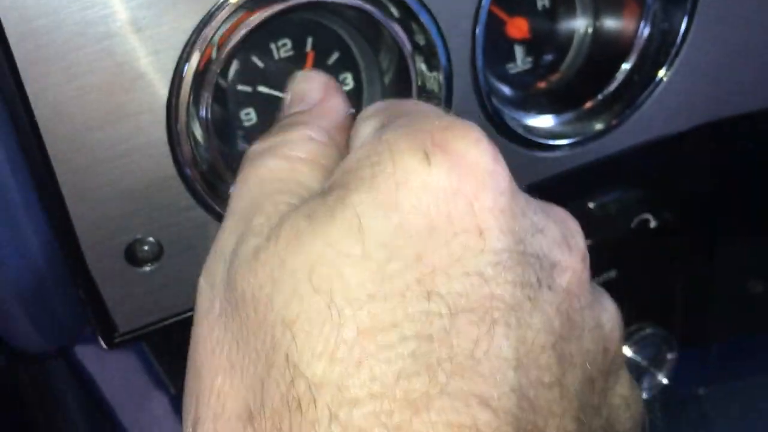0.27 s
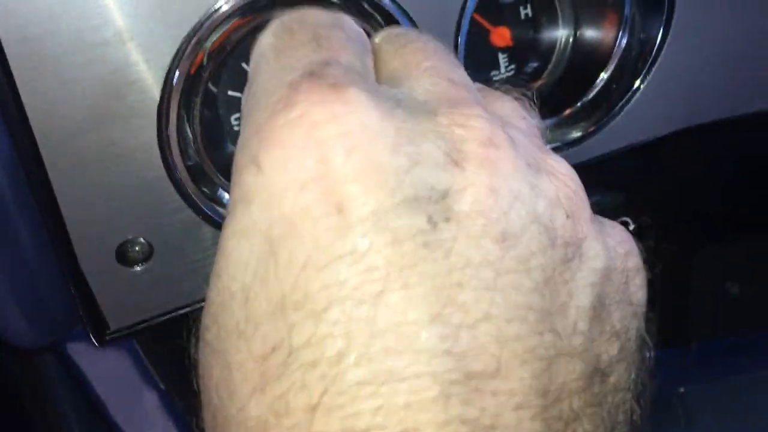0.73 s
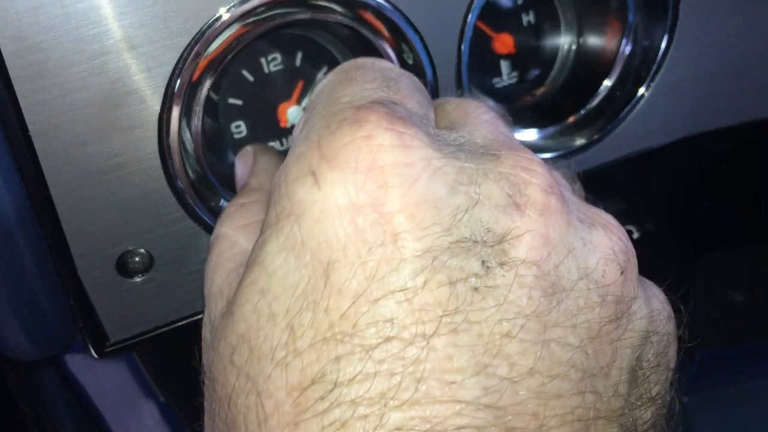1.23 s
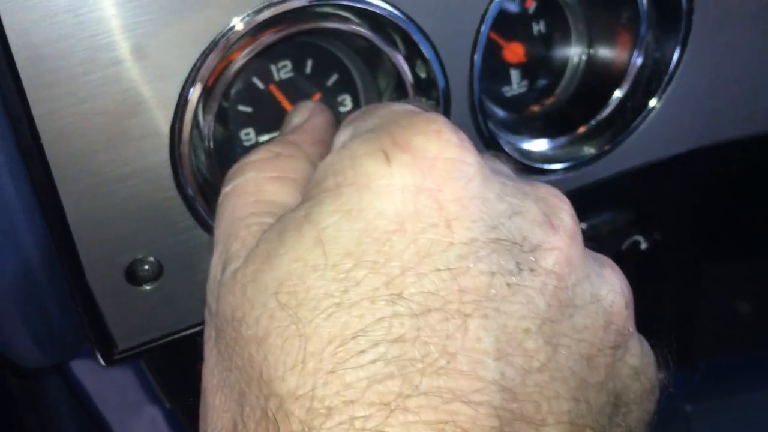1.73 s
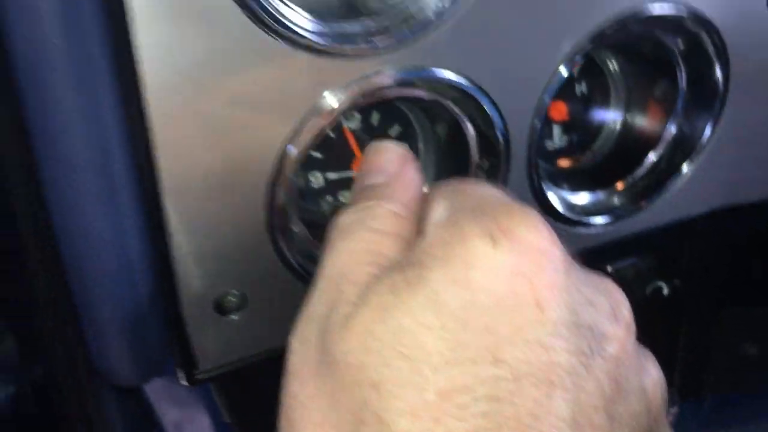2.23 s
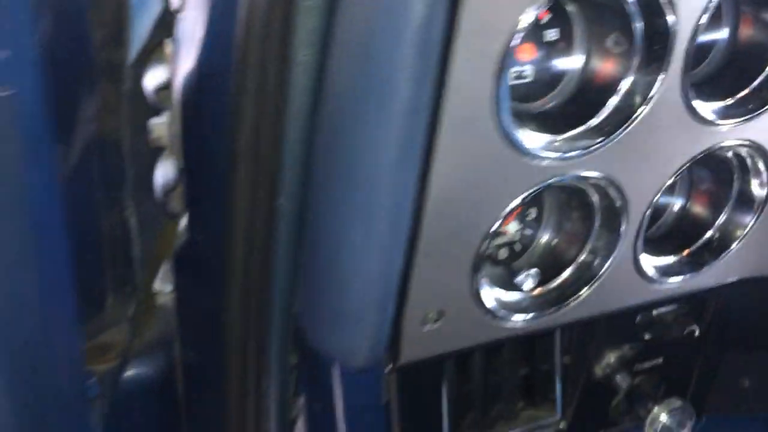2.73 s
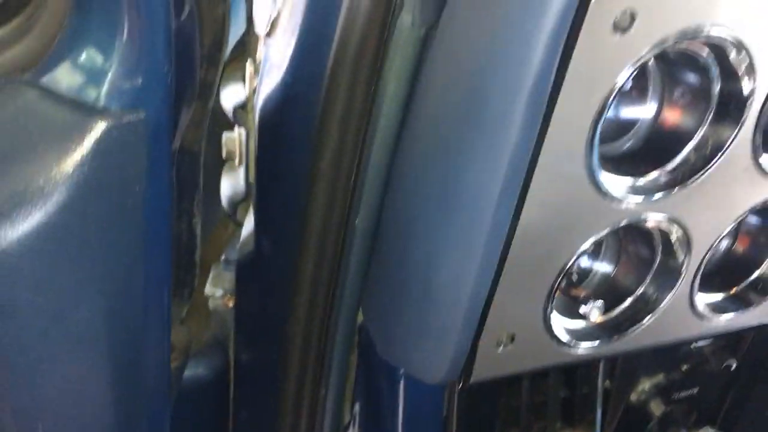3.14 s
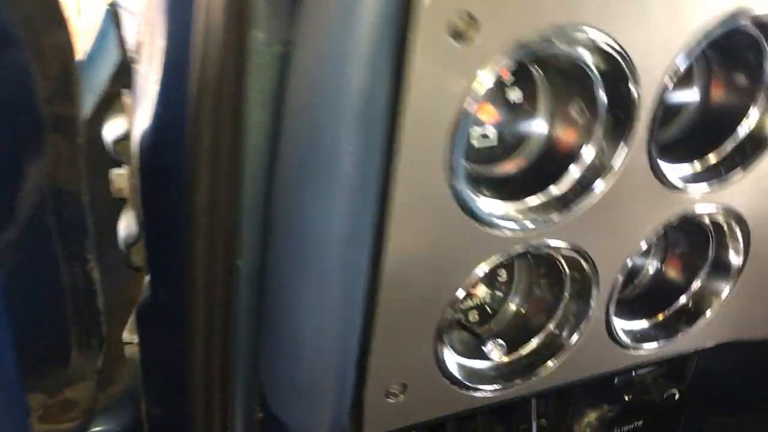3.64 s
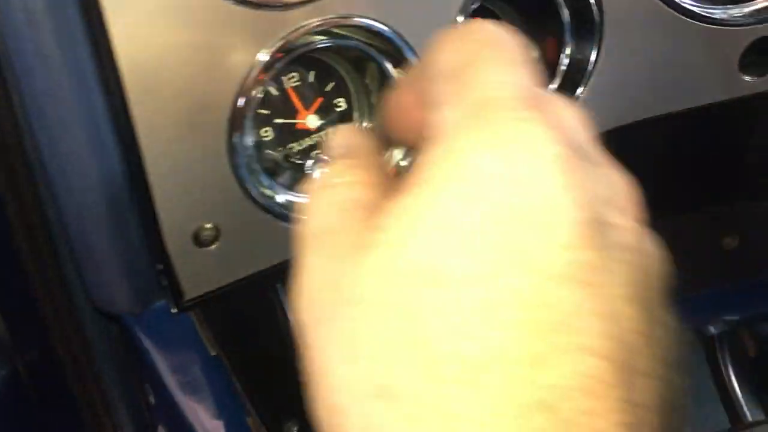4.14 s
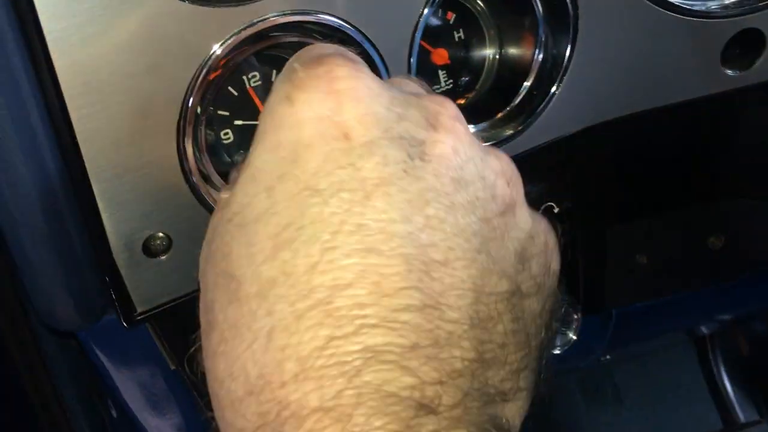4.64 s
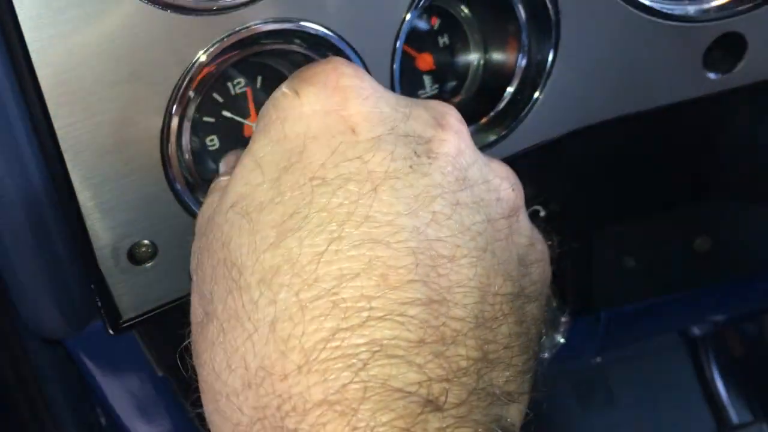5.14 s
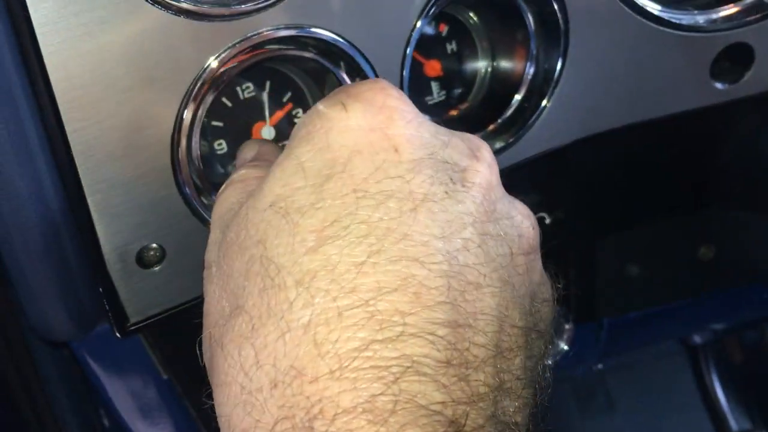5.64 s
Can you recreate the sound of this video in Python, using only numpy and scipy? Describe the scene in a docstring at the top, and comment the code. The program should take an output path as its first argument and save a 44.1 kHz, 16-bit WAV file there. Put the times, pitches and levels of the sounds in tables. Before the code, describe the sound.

Inside a closed, quiet cab with swelling low booms and faint hiss, fingers work a stiff clock stem right beside a phone. Two hard metallic cracks clip the microphone, each with brief ringing, clatter and a dull dash thump. Between them the knob turns with a dry, uneven rasp. Later come dull fingertip taps, several moderate ticks in quick succession, and light scraping with tiny squeaks.

```python
"""The stem of a dashboard clock ticks and snaps in a parked truck, set by hand a few centimetres from a phone.
Two snaps overload the microphone: a noise crack, ringing case modes, clatter and a low dash thump.
Between them the knob turns with a dry rasp of dense slips; later it ticks and scrapes in short twists,
with brief squeaks of wavering tone. The closed cab hums in low booms and rumble under faint hiss."""
import sys
import numpy as np
from scipy import signal
from scipy.fft import rfft, irfft, next_fast_len
from scipy.io import wavfile
from scipy.ndimage import uniform_filter1d

SR = 44100
rng = np.random.default_rng(int(sys.argv[2]) if len(sys.argv) > 2 else 0)


def materialize(psi):
    """Save the field psi as 16-bit PCM at rate SR to the path in sys.argv[1].

    A 1-D psi becomes a single channel; in a 2-D psi each row is a channel.
    """
    bounded = np.clip(np.atleast_2d(psi).T, -1, 1)
    quanta = np.round(bounded * 32767).astype(np.int16)
    wavfile.write(sys.argv[1], SR, quanta)


N = 259749
TIME = np.arange(N) / SR  # seconds

# modes of the clock case and its metal panel: pitch_hz, level_db (relative), t60_s
CASE_MODES = [(564, -11.5, 0.76), (618, -8, 0.1), (876, -5.5, 0.12), (1030, -3.5, 0.15), (1256, -1, 0.1),
              (1276, 3, 0.07), (1427, 0, 0.019), (1663, -4.5, 0.035), (1594, 2, 0.05), (1950, -7, 0.055),
              (1943, -4, 0.11), (2150, -11, 0.071), (2250, -4, 0.078), (2386, -10, 0.1), (2500, -16, 0.038),
              (2970, -22, .08), (3460, -9, 0.12), (4140, -21.5, 0.079), (4290, -7.5, 0.11),
              (5820, -3.5, 0.059), (6000, -1.5, 0.065), (6480, -2.5, 0.09), (7108, 2, 0.028),
              (7260, -0.5, .05), (8250, 3, 0.095), (8940, 6.5, 0.064), (9564, 8.5, 0.045), (13200, 0, .05),
              (13170, -3, 0.036)]
# spectrum of rubbing, also lent to the cab's answer: freq_hz, level_db (relative, per Hz)
RASP_SPECTRUM = [(250, -19.5), (550, -3.5), (950, 5.5), (1400, 6), (2400, -1), (3000, -5), (4000, -8.5),
                 (5200, -12.5), (6500, -8), (7400, -9), (8500, -7.5), (11000, -13.5), (15000, -19.5)]


def undb(db):
    """Decibels to gain."""
    return 10 ** (np.asarray(db) / 20)


def unit(x):
    """Scale to rms 1."""
    return x / np.sqrt(np.mean(x ** 2))


def add(out, start_s, x):
    """Mix x into out from start_s, cut off at the end of out."""
    i = max(int(start_s * SR), 0)
    out[i:i + len(x)] += x[:len(out) - i]


def shape(x, gain):
    """Filter x with a gain that is a function of frequency in Hz."""
    size = next_fast_len(len(x))
    hz = np.maximum(np.arange(size // 2 + 1) * SR / size, 1)
    return irfft(rfft(x, size) * gain(hz), size)[:len(x)]


def colour(x, points, tilt=0):
    """Give x a spectrum of (Hz, dB) points, tilted in dB per octave and closed below; rms 1."""
    hz, db = np.transpose(points)

    def gain(f):
        level_db = np.interp(np.log(f), np.log(hz), db) + tilt * np.log2(f)
        return undb(level_db) * np.minimum(f / hz[0], 1) ** 2

    return unit(shape(x, gain))


def fade(t, t60):
    """Exponential decay, 60 dB in t60 seconds."""
    return np.exp(-np.log(1000) * t / t60)


def ring(modes, t, tilt=0):
    """Damped modes after a blow, starting near rms 1, in fresh random phases for every blow."""
    hz, db, t60 = np.transpose(modes)[:, :, None]
    gain = undb(db + tilt * np.log2(hz))
    waves = np.sin(2 * np.pi * (hz * t + rng.random(hz.shape)))
    return np.sum(gain * waves * fade(t, t60), axis=0) / np.sqrt(np.sum(gain ** 2) / 2)


def walk(rate):
    """Slow random wander through rate random points a second, with a spread near 1."""
    knots = rng.standard_normal(int(N / SR * rate) + 2)
    return np.interp(TIME * rate, np.arange(len(knots)), knots)


def hiss(level_db=-53.08):
    """Faint, smooth background air: steady noise with a falling spectrum."""
    # spectrum of the air: freq_hz, level_db (relative, per Hz)
    air_spectrum = [(350, -13.5), (700, -11), (1100, -11), (1900, -17.5), (3200, -21), (5000, -29),
                    (6500, -26), (8000, -30), (9600, -23.5), (10800, -29), (13000, -25), (15000, -34)]
    return undb(level_db) * colour(rng.standard_normal(N), air_spectrum)


def boom(hz, waver, waver_rate, partner_db=-5, throb_db=2.0, throb_rate=11):
    """A close pair of low tones that wander in pitch, beat and throb; rms 1."""
    def tone():
        return np.sin(2 * np.pi * np.cumsum(hz * (1 + waver * walk(waver_rate))) / SR)

    pair = tone() + undb(partner_db) * tone()
    return unit(pair * undb(throb_db * walk(throb_rate)))


def resonate(modes, even_s=0.33):
    """Noise rumbling in air resonances, with its slow level evened out to rms 1."""
    def gain(f):
        return sum(undb(db) / (1 + ((f / hz - hz / f) * hz / width) ** 2) for hz, width, db in modes)

    x = shape(rng.standard_normal(N), gain)
    window = signal.windows.hann(int(even_s * SR))
    power = signal.fftconvolve(x ** 2, window, "same") * 2 / (even_s * SR)
    return x / np.sqrt(power)


def cab_hum(deep_db=-37.5, rumble_db=-2.0, settle_s=0.6, follow=1.1, rest_db=-35):
    """Two wavering cab booms swell and sink; rumble follows the upper one slowly over an even deep layer."""
    # swell of the two booms, ahead of the small trims below: time_s, lower_db, upper_db
    swells = [(0.0, -36.5, -41), (0.22, -36.5, -40), (0.38, -18, -29.5), (0.55, -39.5, -33),
              (0.7, -29, -31.5), (1.35, -28.5, -28.5), (1.551, -35.5, -33), (1.851, -26.5, -40.5),
              (2.1, -34.5, -36), (2.498, -25.5, -42), (3.5, -38, -39), (3.78, -20.5, -44),
              (4.05, -35.5, -38.5), (4.45, -26.5, -32), (5.0, -20.5, -26), (5.55, -33.5, -32),
              (5.89, -27, -47)]
    # broad rumble of the cab: pitch_hz, width_hz, level_db (relative)
    rumble_modes = [(85, 24, 3), (104.26, 26, 9), (145.9, 37, -1.5), (197.6, 31, 2.5), (234, 20, -0.5),
                    (262.3, 19, -13), (299, 21, -11.5), (354.8, 18, -11), (450, 260, -34)]
    # deepest cab resonances: pitch_hz, width_hz, level_db (relative)
    deep_modes = [(43, 5, -7.5), (62, 120, -10)]
    s, lower_db, upper_db = np.transpose(swells)
    lower_db, upper_db = np.interp(TIME, s, lower_db), np.interp(TIME, s, upper_db)
    slow_db = rest_db + follow * uniform_filter1d(upper_db - rest_db, int(settle_s * SR))
    lower = undb(lower_db - 1) * boom(hz=102.85, waver=.05, waver_rate=12)
    upper = undb(upper_db + 0.2) * boom(hz=178.4, waver=.05, waver_rate=14)
    rumble = undb(rumble_db + slow_db) * resonate(rumble_modes)
    return lower + upper + rumble + undb(deep_db) * resonate(deep_modes)


def echoes(x, trim_db=-1):
    """Dash, glass and roof close by return the sound and comb its spectrum."""
    # early echoes: delay_s, level_db (relative to the direct sound)
    reflections = [(.0029, -17), (.0053, -10), (.0096, -13), (0.0132, -9)]
    out = x.copy()
    for delay, db in reflections:
        add(out, delay, undb(db) * x)
    return undb(trim_db) * out


def touches(rise_s=0.0024):
    """A fingertip gives a soft, dull tick: a noise burst with a gentle rise and a decay."""
    # fingertips on the knob, its rim or the phone: start_s, level_db (before the decay), t60_s
    taps = [(3.093, -48, 0.32), (4.094, -42.5, .17), (4.405, -30, 0.045), (4.533, -39, 0.044)]
    # spectrum of a fingertip: freq_hz, level_db (relative, per Hz)
    tap_spectrum = [(900, -10), (1400, -3), (1950, 4.5), (2600, -7), (4300, -14), (5600, -18), (7200, -35),
                    (15000, -36)]
    out, t = np.zeros(N), TIME[:SR // 4]
    for s, db, t60 in taps:
        tap = colour(rng.standard_normal(len(t)), tap_spectrum)
        add(out, s, undb(db) * tap * fade(t, t60) * (1 - np.exp(-t / rise_s)))
    return out


def rasp(size, tilt, slips_per_s=1900, spread_db=3, ring_db=-3):
    """Dense tiny slips hiss directly and ring the case; spread_db makes their strength uneven; rms 1."""
    strength = undb(spread_db * np.minimum(rng.exponential(size=size), 4))
    slips = (rng.random(size) < slips_per_s / SR) * rng.choice([-1, 1], size) * strength
    # rubbing reaches only the middle modes
    middle = [mode for mode in CASE_MODES if 800 < mode[0] < 3000]
    case = signal.fftconvolve(slips, ring(middle, TIME[:SR // 10], tilt + 2))[:size]
    return unit(colour(slips, RASP_SPECTRUM, tilt) + undb(ring_db) * unit(case))


def squeaks(jitter=0.033, jitter_rate=600):
    """Where the knob sticks, slips lock to one rate and sound a wavering tone with two overtones."""
    # squeaks of the knob: start_s, length_s, pitch_hz, level_db, overtones_db (relative)
    sticking = [(0.905, 0.018, 1526, -35, -15), (0.996, 0.0086, 2090, -35.5, -7),
                (5.135, 0.022, 1575, -27.5, -23), (5.244, 0.013, 1430, -36.5, -30)]
    out = np.zeros(N)
    for s, length, hz, db, overtones_db in sticking:
        size = int(length * SR)
        phase = 2 * np.pi * np.cumsum(hz * (1 + jitter * walk(jitter_rate)[:size])) / SR
        overtones = np.sin(2 * phase) / 2 + np.sin(3 * phase)
        tone = unit(np.sin(phase) + undb(overtones_db) * overtones)
        add(out, s, undb(db) * tone * signal.windows.tukey(size, .7))
    return out


def winding(edge=0.29, scatter_db=3.5, slide_db=-8, catch_share=0.6, ease_db=-7, ease_s=0.23):
    """The knob catches once a step and slides quietly in between, ever more lightly as the grip eases."""
    # steady turning: start_s, end_s, step_s, level_db (before the easing), tilt_db_per_octave
    spells = [(0.0, 0.151, 0.0469, -33.5, 0.6), (5.035, 5.863, .095, -41.5, -2.1)]
    out = np.zeros(N)
    for start, end, step_s, db, tilt in spells:
        t = TIME[:int((end - start) * SR)]
        grip = np.full(len(t), undb(slide_db))
        catch = signal.windows.tukey(int(catch_share * step_s * SR), edge)
        for s in np.arange(0, t[-1], step_s):
            add(grip, s, catch * undb(scatter_db * rng.standard_normal()))
        # starts half the easing down and sinks by the whole of it, with time constant ease_s
        eased_db = db + ease_db * (0.5 + 1 - np.exp(-t / ease_s))
        add(out, start, undb(eased_db) * grip * rasp(len(t), tilt))
    return out


def twists(edge=0.35):
    """Each short twist of the knob is a burst of rasp that swells and stops."""
    # short twists: start_s, length_s, level_db, tilt_db_per_octave
    bursts = [(0.292, 0.025, -43.5, 5), (0.765, .125, -39.5, 2), (0.902, 0.039, -36.5, -1),
              (0.974, .03, -43.5, .5), (1.723, 0.06, -39.5, 1.5), (2.02, 0.023, -42.5, -1),
              (2.218, .06, -40, 2), (4.889, 0.073, -48, -4.5), (5.038, 0.036, -39, 0),
              (5.124, .072, -35, 0), (5.426, .047, -46.5, -2.5)]
    out = np.zeros(N)
    for s, length, db, tilt in bursts:
        size = int(length * SR)
        add(out, s, undb(db) * rasp(size, tilt) * signal.windows.tukey(size, edge))
    return out


def long_turn(grip_db=3.5, grip_rate=150, body_db=-0.76, sing_db=-2.5, sing_width_hz=550):
    """The knob winds the hands round; the grip catches unevenly, and harder turning sings higher and louder."""
    # effort of the turn: time_s, level_db (of the rasp, before body_db and sing_db), treble_db
    turn = [(1.07, -52.5, -67), (1.102, -36, -51), (1.136, -39, -50.5), (1.244, -32, -35.5),
            (1.256, -36, -44.5), (1.502, -46, -59.5), (1.514, -41, -55), (1.704, -47, -55.5),
            (1.715, -50, -69)]
    sing_hz, sing_rise_hz = 1140, 1440  # pitch under a light grip, and its rise at full effort
    s, db, treble_db = np.transpose(turn)
    level_db = np.interp(TIME, s, db)
    sound = rasp(N, 0, slips_per_s=990, spread_db=0.0)
    body = unit(shape(sound, lambda f: f < 4000))
    treble = unit(shape(sound, lambda f: f >= 4000))
    # half-regular slipping gathers in a rough band that rises with the effort
    effort = undb(level_db - db.max())
    phase = 2 * np.pi * np.cumsum(sing_hz + sing_rise_hz * effort) / SR
    band = walk(sing_width_hz) * np.cos(phase) + walk(sing_width_hz) * np.sin(phase)
    sing = effort * unit(band)
    grip = undb(grip_db * walk(grip_rate)) * (TIME > s[0]) * (TIME < s[-1])
    low = undb(level_db) * (undb(body_db) * body + undb(sing_db) * sing)
    return grip * (low + undb(np.interp(TIME, s, treble_db)) * treble)


def clicks(clatter_db=-8, crack_db=4.5, crack_t60=0.031, cab_db=-38, cab_t60=0.27, free_t60=0.13):
    """The stem hits its stop with a crack: case rings, works clatter, dash thumps, cab answers briefly."""
    # snaps and ticks of the stem: start_s, level_db, tilt_db_per_octave, t60_s
    blows = [(0.215, -34, -1, 0.047), (0.309, -35.5, -3, 0.39), (0.3408, 0, -.5, 0.085),
             (0.859, -19.5, 2, .015), (2.181, -40.5, -3, 0.14), (2.241, 0, -0.8, 0.082),
             (4.685, -24.5, -.3, .1), (4.81, -36.5, 0, 0.019), (4.826, -23, -5, 0.11),
             (4.833, -18.5, -4.5, 0.045), (4.846, -27, -3, 0.11), (4.857, -25, -5, 0.084),
             (4.9686, -18, -0.3, 0.084), (5.041, -37, -5, .13)]
    # spectrum of crack and clatter: freq_hz, level_db (relative, per Hz)
    snap_spectrum = [(200, -8.5), (700, -8), (1300, 1.5), (2400, 0), (3300, -7), (5000, -7.5), (6300, -2),
                     (9300, -10.5), (10300, -9), (12000, 0.5), (15000, -13)]
    # low modes of the dashboard: pitch_hz, level_db (relative), t60_s
    dash_modes = [(102.6, -5, 0.17), (137.5, 1, 0.21), (194.4, 1.5, 0.17), (289.4, -8, 0.21),
                  (364.5, 1.5, 0.13), (396, -6, 0.15)]
    hard_contact_s, soft_contact_s = 0.0006, .0012  # rise time of a full snap and of the lightest tick
    thump_db, thump_db_per_tilt, thump_rise_s = -13.5, -3, 0.0049  # duller clicks thump the dash more
    out, t = np.zeros(N), TIME[:SR // 2]

    def burst(spectrum, tilt):
        return colour(rng.standard_normal(len(t)), spectrum, tilt)

    for s, db, tilt, t60 in blows:
        # fingers on the knob damp the case further when t60 is shorter than free_t60
        damping = max(1 - t60 / free_t60, 0)
        case = ring(CASE_MODES, t, tilt) * fade(t * damping, t60)
        crack = undb(crack_db) * burst(snap_spectrum, tilt + 1.7) * fade(t, crack_t60 * t60 / free_t60)
        works = echoes(undb(clatter_db) * burst(snap_spectrum, tilt - .6) * fade(t, t60))
        cab = undb(cab_db) * burst(RASP_SPECTRUM, tilt) * fade(t, cab_t60)
        thump = undb(thump_db + thump_db_per_tilt * tilt) * ring(dash_modes, t)
        thump = thump * (1 - np.exp(-t / thump_rise_s))
        # a lighter blow has a softer contact and builds the sound up more slowly
        contact_s = np.interp(undb(db), [0, 1], [soft_contact_s, hard_contact_s])
        rise = 1 - np.exp(-t / contact_s)
        add(out, s, undb(db) * ((case + crack + works + cab) * rise + thump))
    return out


def scene():
    """The clock's noises over the hum of the cab, as one channel."""
    rubbing = twists() + winding() + long_turn() + squeaks()
    return (cab_hum() + hiss() + touches() + echoes(rubbing) + clicks())[None]


def record(dry, low_cut_hz=30, top_hz=15150):
    """The phone drops the deepest bass, clips the two hard snaps and cuts the top."""
    low_cut = signal.butter(4, low_cut_hz, "highpass", fs=SR, output="sos")
    clipped = np.clip(signal.sosfilt(low_cut, dry), -1, 1)
    top_cut = signal.ellip(10, .1, 90, top_hz, fs=SR, output="sos")
    return signal.sosfilt(top_cut, clipped)


dry = scene()
out = record(dry)
materialize(out)
```